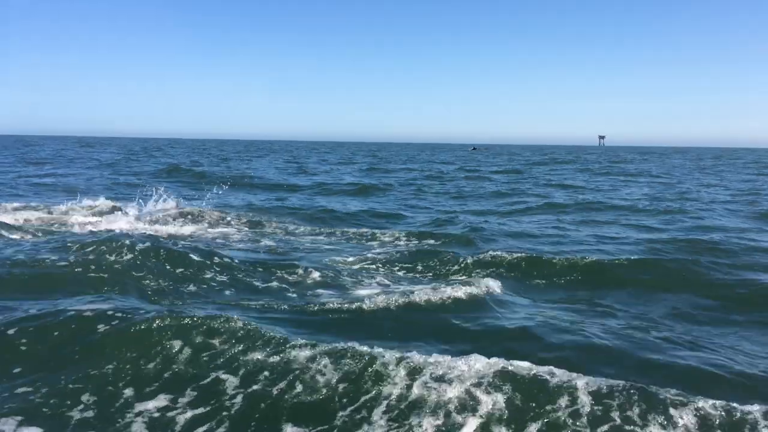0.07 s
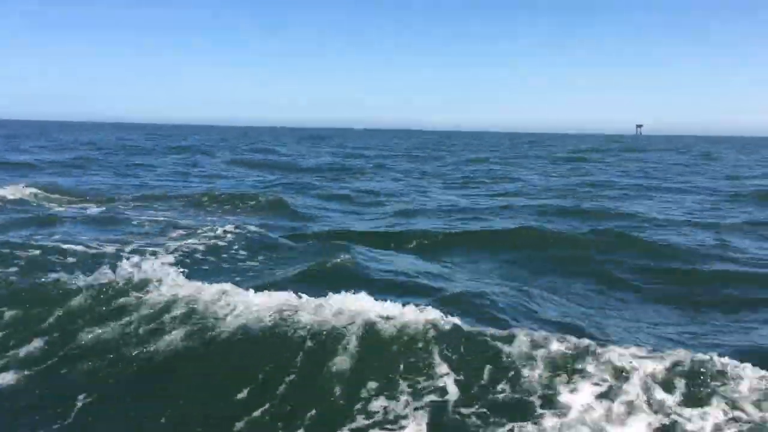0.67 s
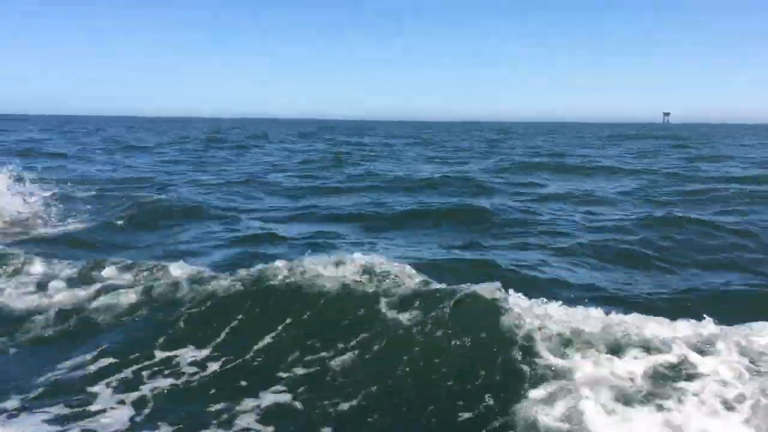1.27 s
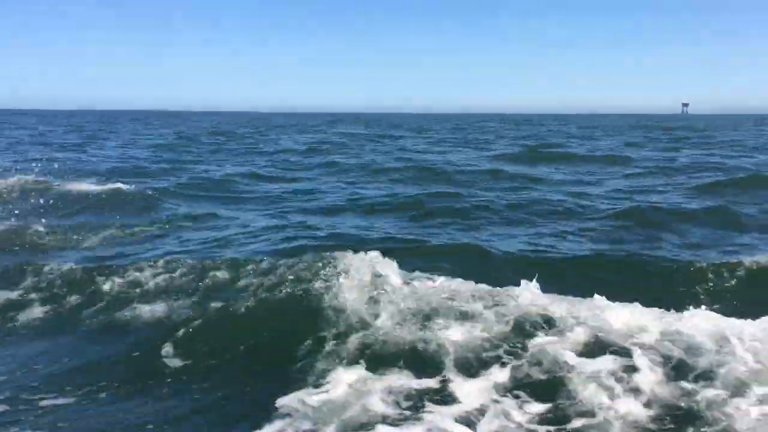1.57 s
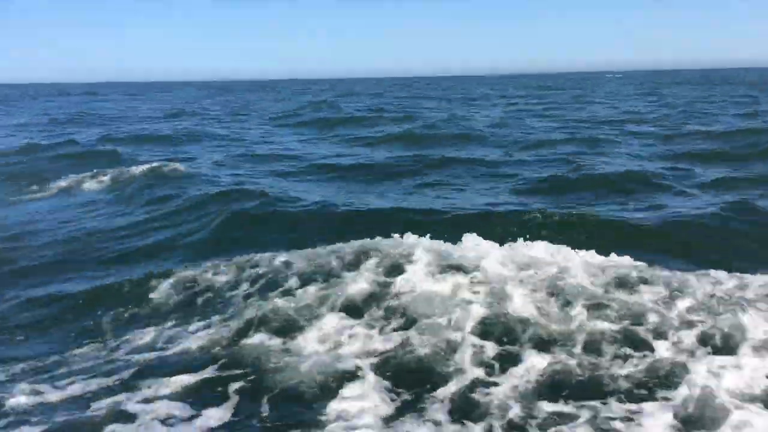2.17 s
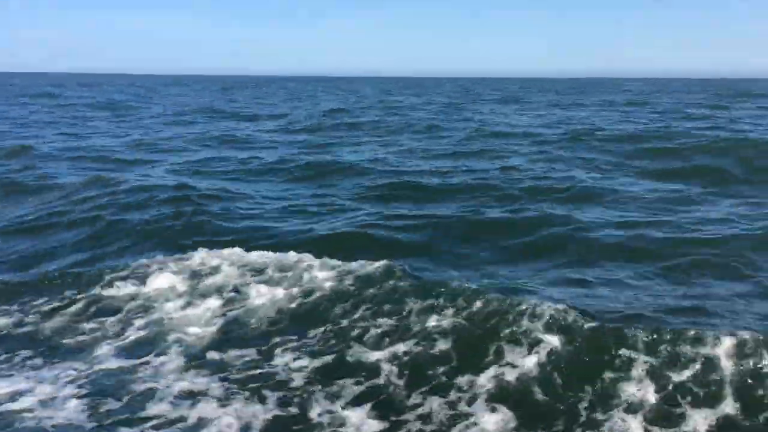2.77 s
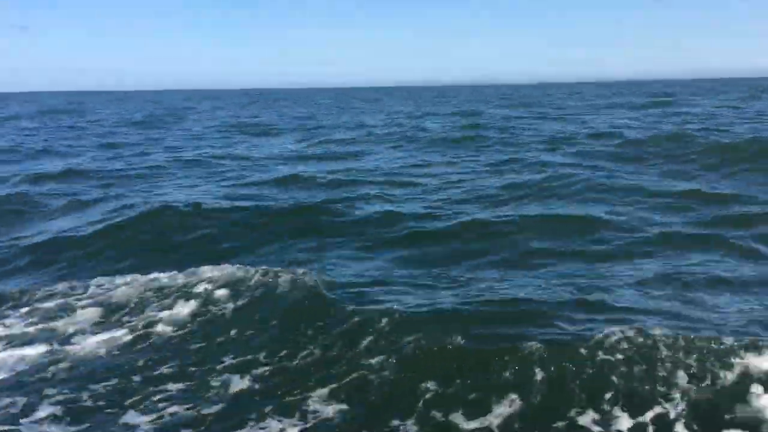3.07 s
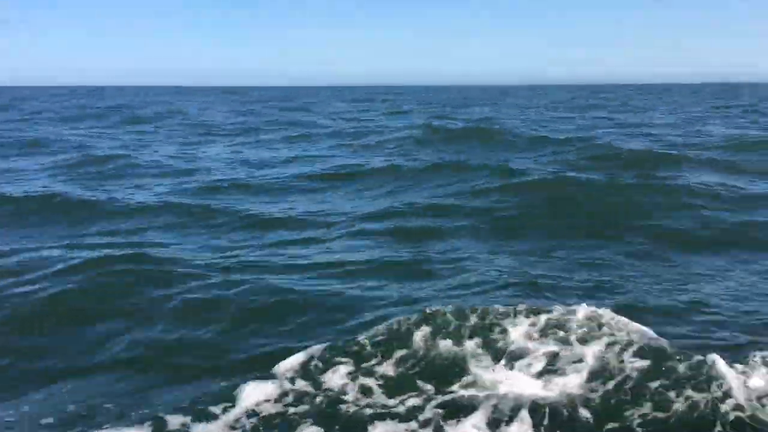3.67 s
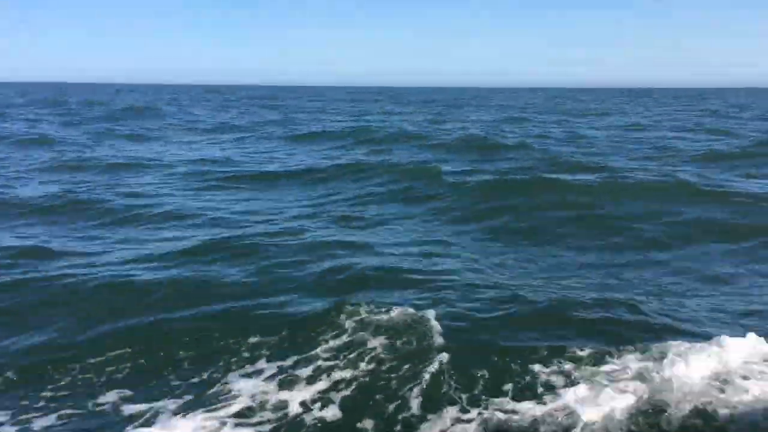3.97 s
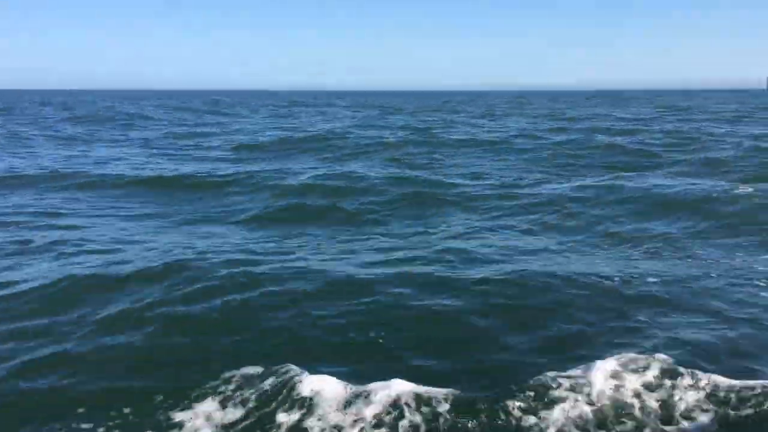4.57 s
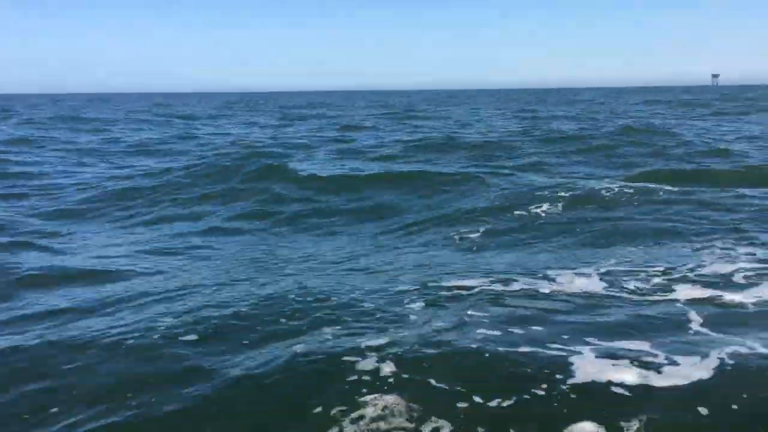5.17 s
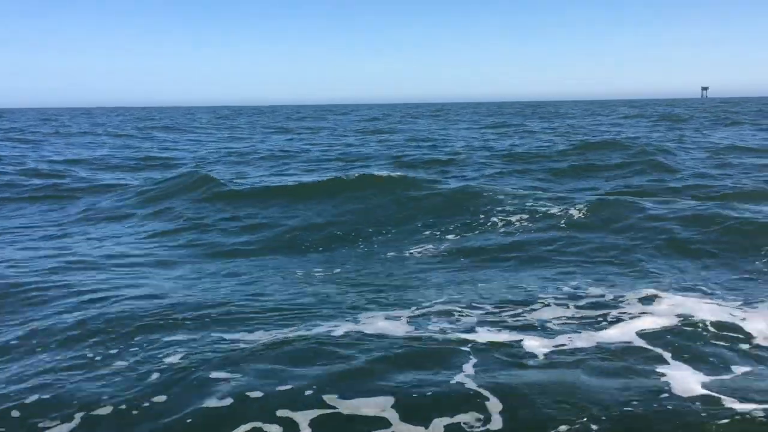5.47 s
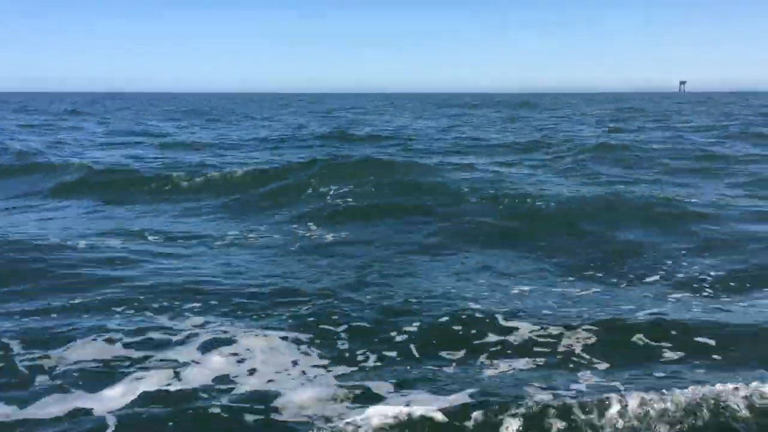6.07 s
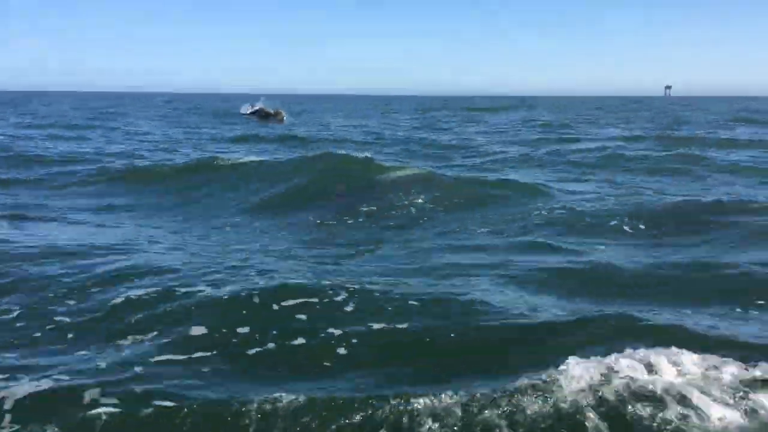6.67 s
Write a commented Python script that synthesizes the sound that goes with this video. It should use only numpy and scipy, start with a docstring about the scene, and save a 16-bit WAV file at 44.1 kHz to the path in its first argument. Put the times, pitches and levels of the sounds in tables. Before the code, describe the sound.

A motor boat's engines throb steadily on the open sea while the wake churns and hisses, with light wind on the microphone.

```python
"""Motor boat on the open sea

Two engines run at different speeds and beat against each other over the burble of the wet
exhaust and a faint clatter. Bubbles churn, hiss and fizz in the wake, the far sea hisses, and a
little wind buffets the microphone. Now and then water gulps, slaps the hull and spits spray."""
import sys
import numpy as np
from scipy import signal
from scipy.fft import rfft, irfft
from scipy.io import wavfile

SR = 44100
rng = np.random.default_rng(int(sys.argv[2]) if len(sys.argv) > 2 else 0)


def unload_audio(sound):
    """Save the sound as a 16-bit wav file, at the path given as the first command line argument."""
    columns = np.transpose(np.atleast_2d(sound))
    # keep every value between -1 and 1, then stretch to whole-number steps
    steps = np.round(np.clip(columns, -1, 1) * 32767)
    wavfile.write(sys.argv[1], SR, steps.astype(np.int16))


N = 300762
TIME = np.arange(N) / SR


def gain_of(db):
    """Turn decibels (dB) into a number to multiply by."""
    return 10 ** (np.asarray(db) / 20)


def evened(x):
    """Scale a signal to an average strength (rms) of 1."""
    return x / np.sqrt(np.mean(x ** 2) + 1e-20)


def follow(rows, column=1):
    """Join timed points with straight lines, giving a value for every sample."""
    rows = np.asarray(rows)
    return np.interp(TIME, rows[:, 0], rows[:, column])


def hump(s, length):
    """A smooth rise and fall of height 1, centred on second s."""
    return np.exp(-(2 * (TIME - s) / length) ** 2)


def colour(x, tone):
    """Shape the lows and highs of x by (Hz, dB) points; strength 1."""
    hz, db = np.transpose(tone)
    f = np.fft.rfftfreq(N, 1 / SR)
    curve_db = np.interp(np.log(f + 1), np.log(hz), db, left=-80, right=-80)
    return evened(irfft(rfft(x) * gain_of(curve_db), N))


def drift(rate_hz):
    """Random wandering, up to about the given rate; strength 1."""
    f = np.fft.rfftfreq(N, 1 / SR)
    slow_only = (f > 0) * np.exp(-(f / rate_hz) ** 2)
    return evened(irfft(rfft(rng.standard_normal(N)) * slow_only, N))


def add(mix, s, sound):
    """Mix a sound in at second s."""
    part = mix[max(round(s * SR), 0):][:len(sound)]
    part += sound[:len(part)]


def firing(turns, tones, waver_db, waver_hz, skew, locked_hz):
    """Engine pulses: tones below locked_hz line up into thumps; all but the strongest waver."""
    top_db = max(db for _, db in tones)
    shaft_hz = np.mean(np.diff(turns)) * SR
    out = np.zeros(N)
    for multiple, db in tones:
        waver = evened(gain_of(waver_db * (db < top_db) * drift(waver_hz)))
        # Each pulse is a push, then a suck; pipe echoes scatter its higher tones in time.
        scatter = 2 * np.clip(multiple * shaft_hz / locked_hz - 1, 0, .5)
        shift = skew + rng.uniform(-np.pi, np.pi) * scatter
        out += gain_of(db) * waver * np.cos(2 * np.pi * multiple * turns + shift)
    return evened(out)


def main_engine(turns, choke_db):
    """A deep throb in which no two firings are alike."""
    # The throb's tones. Each row: multiple of the shaft speed, relative level in dB.
    tones = [(4, 2), (6, -11), (7, -22), (8, -21.5), (10, -22.5), (11, -23), (12, -19.5), (14, -26)]
    # The exhaust with its outlet clear. Each row: time in seconds, level in dB.
    loudness = [(0, -21), (1.4, -20), (3.7, -21.5), (4.4, -24), (5.9, -22.5), (6.6, -21)]
    throb = firing(turns, tones, waver_db=3, waver_hz=1.47, skew=0.66, locked_hz=111)
    return throb * gain_of(follow(loudness) - choke_db + 1.44 * drift(25))


def second_engine(turns, choke_db):
    """The faster engine's firings make a drone that swells and fades."""
    # The drone's tones. Each row: multiple of the shaft speed, relative level in dB.
    tones = [(1, -29), (2, 5), (3, -1), (4, 2), (5, -8), (6, -6), (7, -17), (8, -14.5), (9, -25)]
    # The drone with its outlet clear. Each row: time in seconds, level in dB.
    loudness = [(0.3, -30), (0.75, -26.5), (1.6, -29), (2.3, -31), (2.7, -23.5), (3.05, -33.5), (3.9, -29),
                (5.1, -26), (5.9, -30), (6.8, -26.5)]
    drone = firing(turns, tones, waver_db=2.5, waver_hz=1.0, skew=0.55, locked_hz=110.6)
    return drone * gain_of(follow(loudness) - choke_db)


def burble(puffs, choke_db):
    """Exhaust puffs through water and rumbles in the pipe and hull."""
    # The rumble's tone. Each row: frequency in Hz, relative level in dB.
    tone = [(22, -25), (38, -21), (52, -7), (76, 1), (100, -0.5), (135, -5), (180, -6), (225, -7),
            (265, -14.5), (310, -20), (500, -32)]
    # The rumble before waves choke it. Each row: time in seconds, level in dB.
    loudness = [(0.1, -30), (1.4, -30), (2.7, -33.5), (3.4, -31.5), (4.3, -29.5), (5.4, -32), (6.7, -30.5)]
    return colour(rng.standard_normal(N) * puffs, tone) * gain_of(follow(loudness) - choke_db)


def clatter(puffs):
    """Valves rattle faintly in time with the engines."""
    # The rattle through the deck. Each row: frequency in Hz, relative level in dB.
    tone = [(500, 0.5), (830, -9), (950, 5.5), (1100, -9.5), (1420, -8), (1570, -5.5), (1710, 4),
            (1800, -5.5), (1950, -15), (3000, -21)]
    return colour(rng.standard_normal(N) * puffs, tone) * gain_of(-52)


def engines():
    """Two engines beat against each other and set the pulse of the burble and clatter."""
    # The second engine's shaft. Each row: time in seconds, turns per second.
    second_speed = [(0, 29.36), (0.8, 29.42), (1.6, 29.3), (2.2, 29.16), (2.8, 29.1), (3.5, 29.27),
                    (4.3, 29.35), (6, 29.07), (6.8, 29.04)]
    # Waves choking the exhaust outlet. Each row: middle in seconds, dip in dB, length in seconds.
    chokes = [(0.54, 7, 0.17), (1.028, 10, .18), (1.43, 11, .13), (1.682, 7, 0.045), (1.86, 2.5, .2),
              (2.207, 5.5, 0.32), (2.689, 12, 0.096), (3.148, 9.5, .13), (3.41, 5.5, 0.21),
              (3.71, 4, 0.053), (4.007, 8, 0.12), (4.71, 5, 0.23), (5.002, 6, .06), (5.333, 5, .09),
              (5.96, 3.5, 0.38), (6.297, 6.5, 0.075), (6.75, 6, 0.085)]
    main_shaft_hz = 19.043
    main_turns = main_shaft_hz * TIME + rng.random()
    second_turns = np.cumsum(follow(second_speed)) / SR + rng.random()
    choke_db = sum(dip * hump(s, length) for s, dip, length in chokes)
    puffs = 1 + 0.35 * np.cos(2 * np.pi * 2 * main_turns) + 0.29 * np.cos(2 * np.pi * second_turns)
    throb = main_engine(main_turns, choke_db) + second_engine(second_turns, 0.74 * choke_db)
    return throb + burble(puffs, 0.084 * choke_db) + clatter(puffs)


def wind():
    """Gusts hit the microphone with low, lumpy buffets."""
    gusts = rng.standard_normal(N) * gain_of(1.8 * drift(4))
    return gain_of(-44) * colour(gusts, [(8, -9), (20, 3), (35, 5), (80, -16), (250, -14.5), (600, -55)])


def bubbles(low_hz, high_hz, per_s, cycles, spread_db, sizes=28):
    """Many bubbles, each ringing briefly as its pitch rises; a few are louder."""
    out = np.zeros(N)
    for hz in np.geomspace(low_hz, high_hz, sizes):
        age = np.arange(int(4 * cycles / hz * SR) + 2) * hz / SR / cycles
        fade = np.exp(-2 * age) * (1 - np.exp(-20 * age))
        ring = fade * np.sin(2 * np.pi * cycles * age * (1 + 0.026 * age))
        starts = rng.random(N) < per_s / sizes / SR
        strengths = gain_of(spread_db * np.minimum(rng.standard_exponential(N), 4))
        out += signal.oaconvolve(starts * strengths, ring * hz)[:N]
    return evened(out)


def water(tone, pops, near_share, flicker_db, flicker_hz):
    """A wash of countless far bubbles plus single near ones, surging unevenly."""
    far = np.sqrt(1 - near_share) * colour(rng.standard_normal(N), tone)
    near = np.sqrt(near_share) * colour(pops, tone)
    return evened((far + near) * gain_of(flicker_db * drift(flicker_hz)))


def wake():
    """Large bubbles churn, smaller ones hiss on the breaking crest, the finest fizz in the foam."""
    # The wake swells as the boat rolls. Each row: time in seconds, crest level in dB, fizz level in dB.
    swells = [(0.1, -43.5, -50), (0.45, -46, -53.5), (1.55, -44, -51), (2.1, -47.3, -53.5),
              (2.95, -49.5, -55), (3.75, -49.5, -55.5), (4.5, -51.5, -57.5), (5.65, -50.5, -58.5),
              (6.8, -45.5, -57)]
    # Toppling crests. Each row: middle and length in seconds, change of churn and of hiss in dB.
    breakers = [(0.64, 0.18, 2, 0), (1.24, 0.16, 1.5, 1.5), (2.407, 0.22, 1, 4), (4.1, 0.4, -1.5, 1.6),
                (4.265, 0.13, 2.5, -0.5), (4.84, 0.2, .5, 2.5), (5.018, .1, -2, 2), (6.803, 0.087, -2, 1.5)]
    # The tones of the three bubble layers. Each row: frequency in Hz, relative level in dB.
    churn_tone = [(200, -14), (310, -1), (375, 2), (420, -3), (650, -2.5), (820, -4.5), (950, -5.5),
                  (1120, -7.5), (1400, -5.5), (1570, -7.5), (1750, -8.5), (1950, -14.5), (2600, -27),
                  (5000, -63)]
    crest_tone = [(900, -6), (1800, -2), (2300, -1), (3400, 0), (4700, -3.5), (5800, -6.5), (6800, -12),
                  (10000, -13.5), (16000, -38)]
    fizz_tone = [(3000, -27), (5500, 1), (7000, -2), (9000, -1.5), (12000, -3.5), (15800, -12)]
    large = bubbles(306, 1890, per_s=350, cycles=5.2, spread_db=1.0)
    small = bubbles(1826, 6420, per_s=1100, cycles=7.2, spread_db=0.5)
    fine = bubbles(5540, 14800, per_s=2000, cycles=4, spread_db=1)
    churn = water(churn_tone, large, near_share=0.22, flicker_db=0.5, flicker_hz=12)
    crest = water(crest_tone, small, near_share=0.26, flicker_db=0.5, flicker_hz=30)
    fizz = water(fizz_tone, fine, near_share=0.39, flicker_db=0.75, flicker_hz=30)
    crest_db, fizz_db = follow(swells, column=1), follow(swells, column=2)
    heave_db = sum(db * hump(s, length) for s, length, db, _ in breakers)
    hiss_db = sum(db * hump(s, length) for s, length, _, db in breakers) + 0.37 * drift(4.3)
    churn_db = -42 + 0.71 * (crest_db - crest_db.mean()) + heave_db  # partly follows the crest
    hiss = crest * gain_of(crest_db + hiss_db) + fizz * gain_of(fizz_db + hiss_db)
    return churn * gain_of(churn_db) + hiss


def far_sea():
    """The distant sea hisses evenly."""
    # The tone of the hiss. Each row: frequency in Hz, relative level in dB.
    tone = [(2000, -4), (6000, 1.5), (10000, -8), (13000, 1), (15800, 1)]
    return colour(rng.standard_normal(N), tone) * gain_of(-57.5)


def gulps(roughness):
    """Trapped air rings, shaken by the water round it; its pitch climbs as it nears the surface."""
    # Large air pockets. Each row: start in seconds, level in dB, first and last Hz, length in seconds.
    pockets = [(0.436, -36, 755, 800, 0.023), (0.603, -37.5, 590, 680, 0.025),
               (0.931, -39, 1185, 1420, 0.044), (1.252, -33, 553, 640, 0.025), (3.628, -42, 900, 930, .03),
               (5.996, -35.5, 483, 906, 0.049), (6.566, -30.5, 400, 760, 0.0254),
               (6.64, -36, 776, 990, 0.038), (6.665, -46, 1140, 1480, 0.035)]
    out = np.zeros(N)
    shake = evened(1 + roughness * drift(120))
    for s, db, start_hz, end_hz, length in pockets:
        hz = np.geomspace(start_hz, end_hz, round(length * SR))
        swell = np.sin(np.linspace(0, np.pi, len(hz)))
        add(out, s, gain_of(db) * swell * np.sin(2 * np.pi * np.cumsum(hz) / SR))
    return out * shake


def splashes(rows, width_octaves, rise_s):
    """Each splash is a quick swell of noise round its own pitch."""
    out, t = np.zeros(N), np.arange(SR // 2) / SR
    f = np.fft.rfftfreq(len(t), 1 / SR) + 1
    for s, db, hz, length in rows:
        band = 1 / (1 + (np.log2(f / hz) / width_octaves) ** 2)
        noise = evened(irfft(rfft(rng.standard_normal(len(t))) * band, len(t)))
        swell = (1 - np.exp(-t / rise_s)) * np.exp(-2 * t / length)
        add(out, s - rise_s, gain_of(db) * noise * swell / swell.max())
    return out


def slaps():
    """Water hits the hull with a hollow smack."""
    # The smacks. Each row: time in seconds, top level in dB, pitch in Hz, length in seconds.
    hits = [(0.615, -44, 700, .03), (1.05, -37.5, 800, .03), (1.19, -39, 1000, 0.044),
            (1.255, -36.5, 900, 0.035), (1.605, -41, 700, 0.032), (3.686, -42, 700, .012),
            (4.26, -45, 570, 0.054), (4.689, -38, 476, 0.058), (4.72, -43, 845, .045),
            (5.35, -38.5, 620, 0.012), (6.63, -46, 750, 0.055)]
    return splashes(hits, width_octaves=0.58, rise_s=0.003)


def spits():
    """Spray flies in short, bright bursts."""
    # The bursts. Each row: time in seconds, top level in dB, pitch in Hz, length in seconds.
    bursts = [(0.855, -39.5, 2300, .012), (1.258, -37.5, 2380, 0.038), (1.262, -41, 6600, 0.025),
              (3.491, -43.5, 2660, 0.01), (4.599, -49, 3000, .012), (4.848, -48, 7350, .03),
              (4.995, -46.5, 3550, 0.016), (5.003, -47, 6500, 0.018), (5.462, -51, 6500, .028)]
    return splashes(bursts, width_octaves=0.37, rise_s=0.0022)


def scene():
    """Water, engines and wind together in one channel."""
    mix = slaps() + spits() + far_sea() + engines() + wind() + wake() + gulps(roughness=0.77)
    return mix[None]


def record(dry):
    """Start with a moment of silence and cut off the very highest treble."""
    silent_s, fade_in_s, top_hz = 0.083, 0.002, 15900
    fade_in = np.clip((TIME - silent_s) / fade_in_s, 0, 1)
    treble_cut = signal.firwin(801, top_hz, window=("kaiser", 9), fs=SR)
    return signal.oaconvolve(dry * fade_in, treble_cut[None], "same")


dry = scene()
out = record(dry)
unload_audio(out)
```